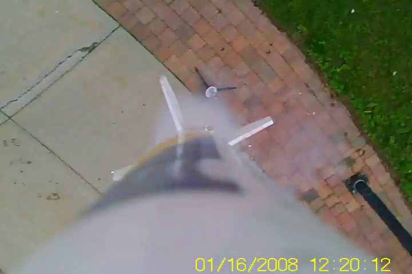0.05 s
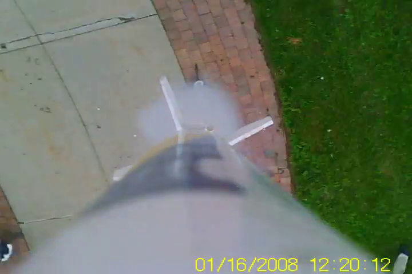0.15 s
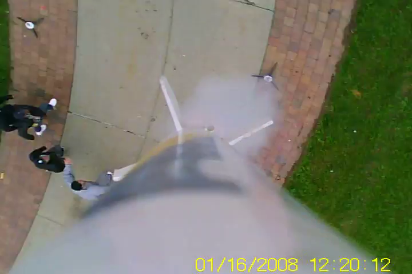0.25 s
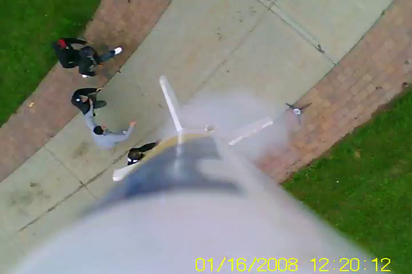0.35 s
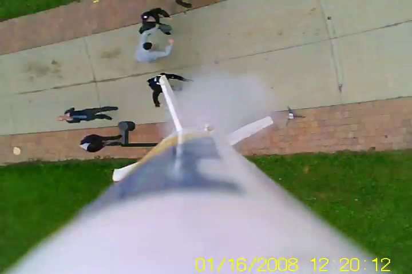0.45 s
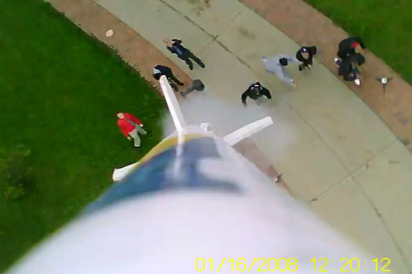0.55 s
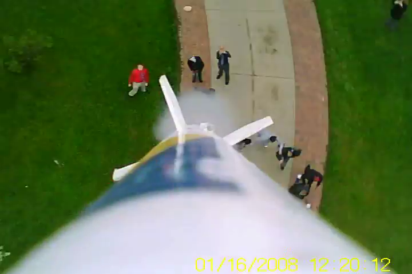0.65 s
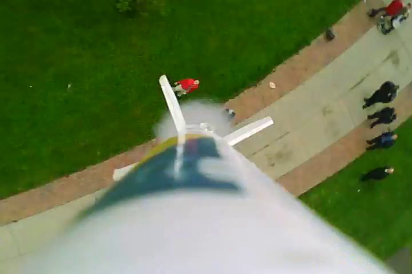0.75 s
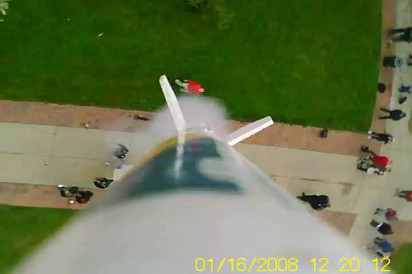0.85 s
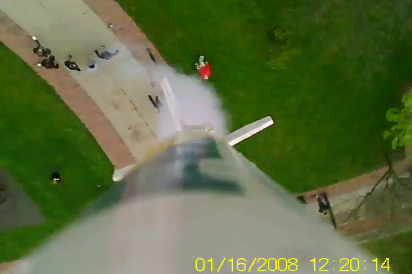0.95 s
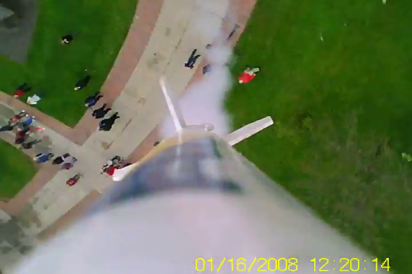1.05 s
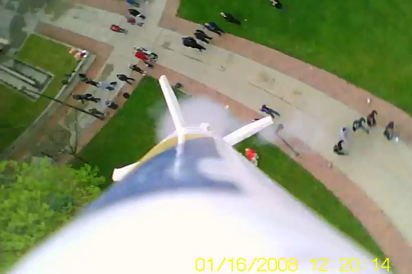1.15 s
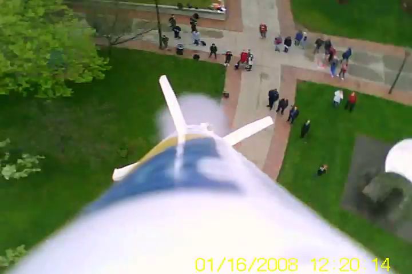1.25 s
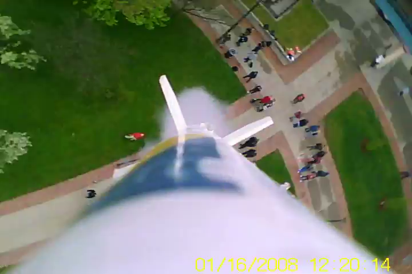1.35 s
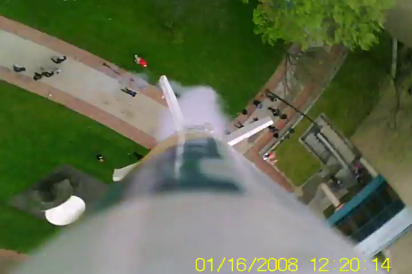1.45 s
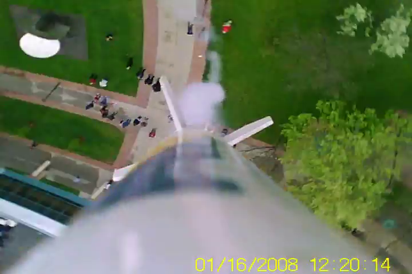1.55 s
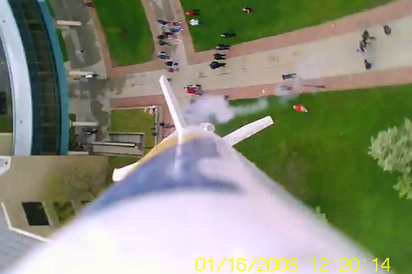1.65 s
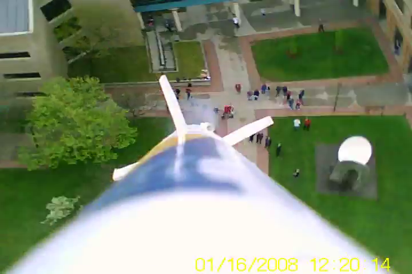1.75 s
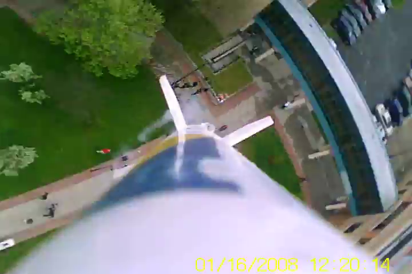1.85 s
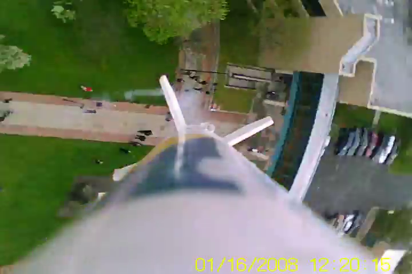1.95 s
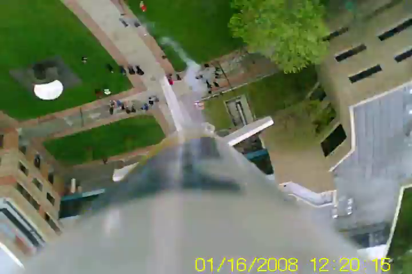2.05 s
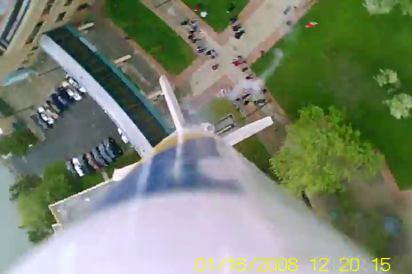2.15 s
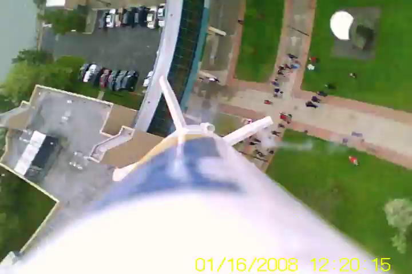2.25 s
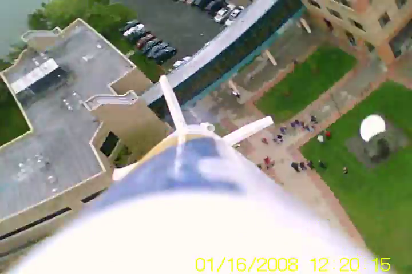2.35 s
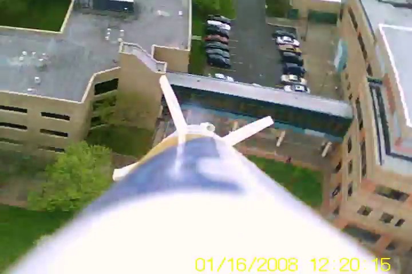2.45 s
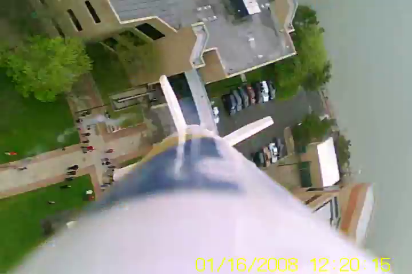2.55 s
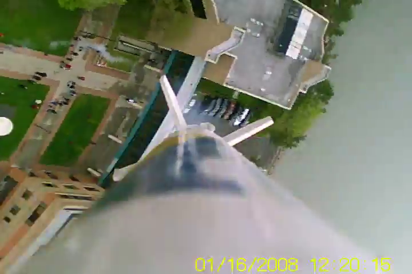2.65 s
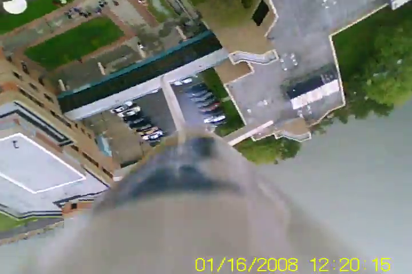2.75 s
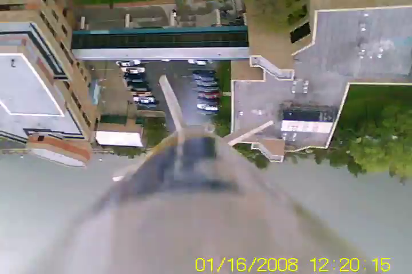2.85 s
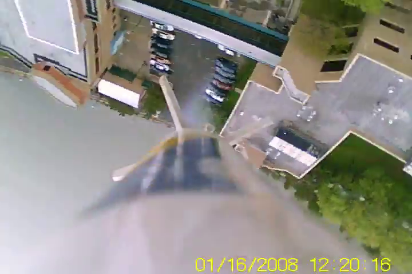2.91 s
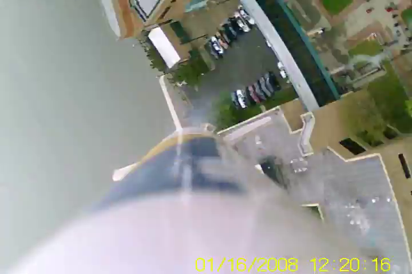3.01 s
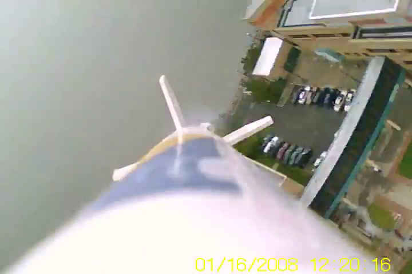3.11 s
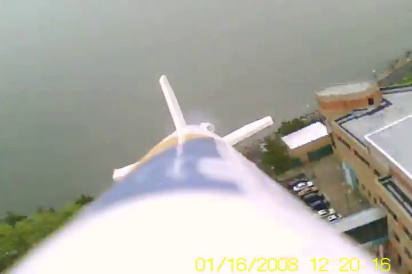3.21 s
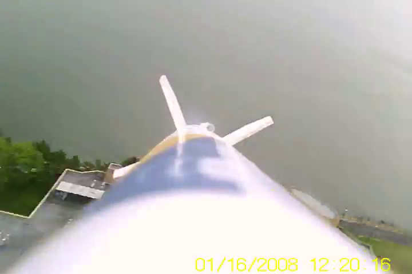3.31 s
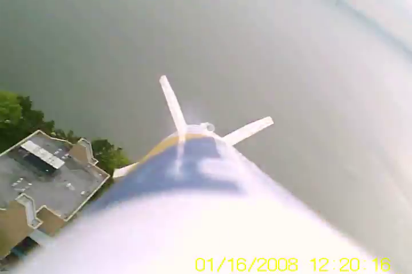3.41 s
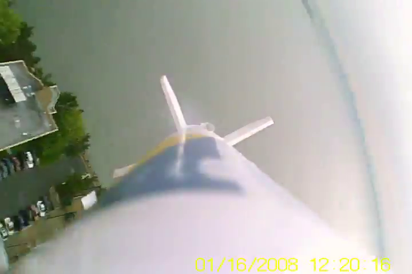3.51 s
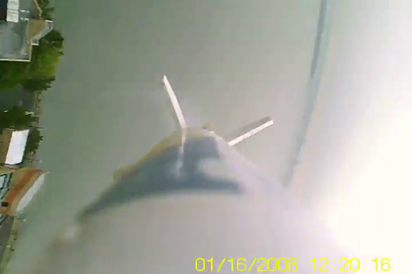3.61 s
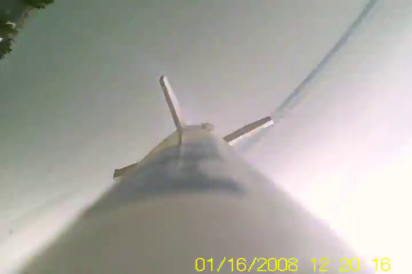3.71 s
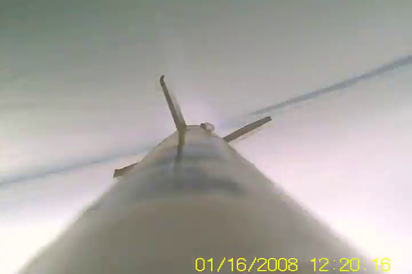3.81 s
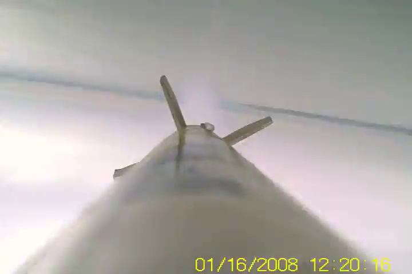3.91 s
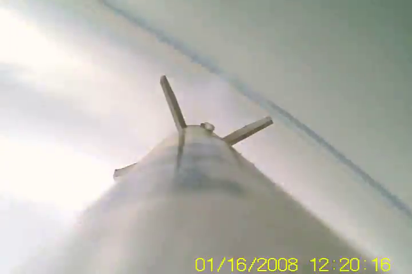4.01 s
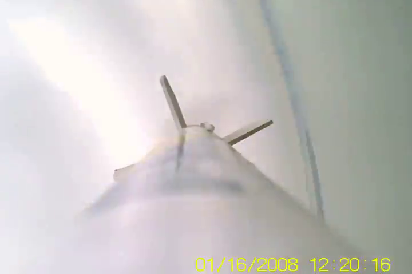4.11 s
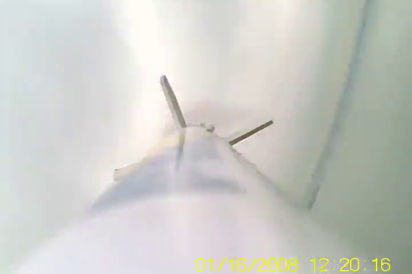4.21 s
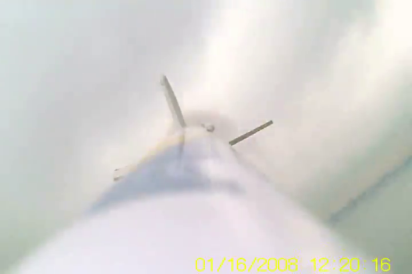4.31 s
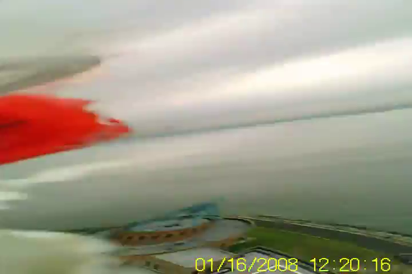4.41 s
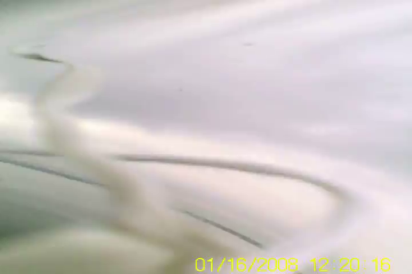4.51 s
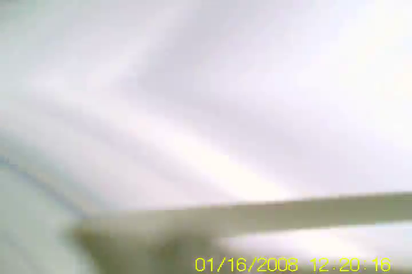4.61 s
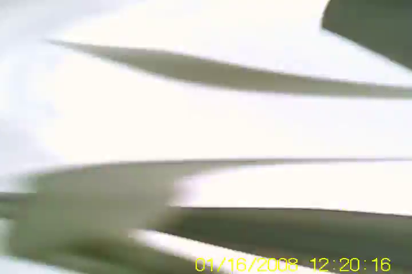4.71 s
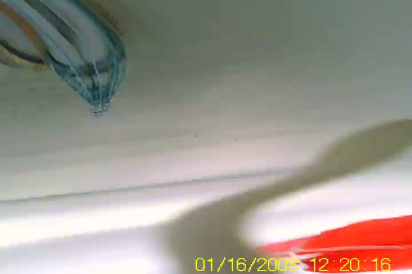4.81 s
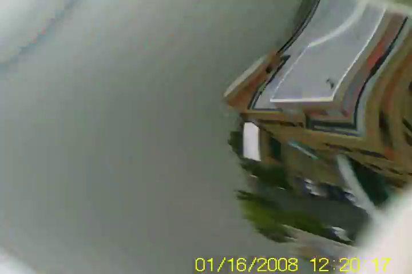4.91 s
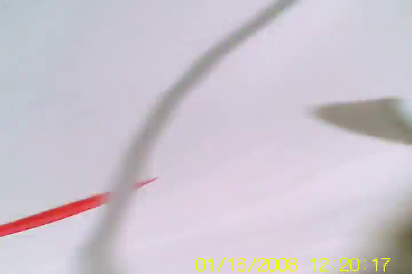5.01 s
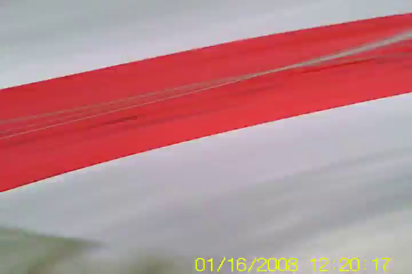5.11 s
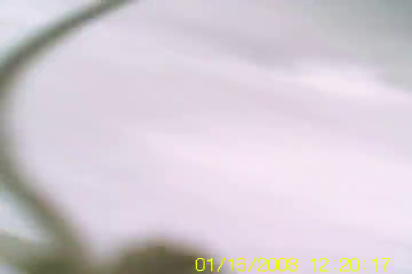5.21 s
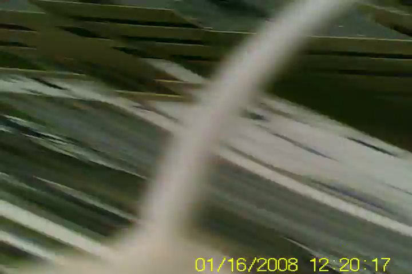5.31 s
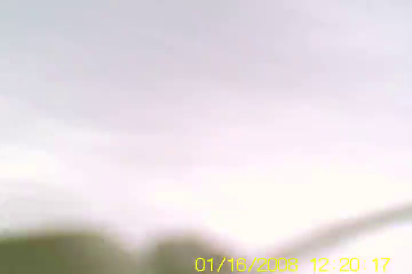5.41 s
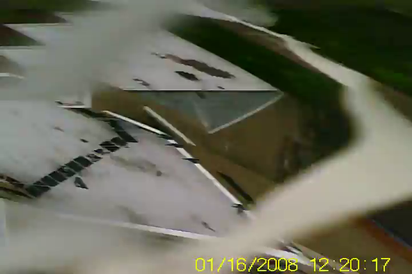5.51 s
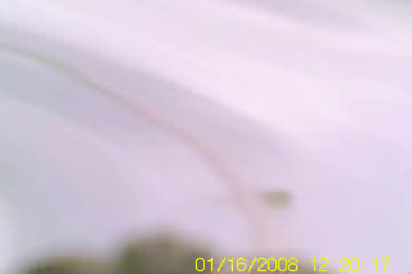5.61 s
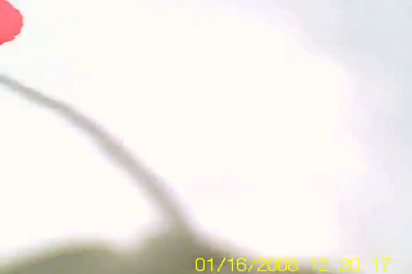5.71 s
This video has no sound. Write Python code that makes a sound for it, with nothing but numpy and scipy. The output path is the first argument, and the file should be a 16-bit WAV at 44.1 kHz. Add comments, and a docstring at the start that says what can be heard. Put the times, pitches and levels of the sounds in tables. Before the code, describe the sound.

Gusty wind and exhaust hiss rush past a climbing rocket, then a sudden loud pop leaves near silence with small clicks.

```python
"""A tiny camera rides on the side of a model rocket. First the motor's exhaust hisses; it gives way to the
airstream, whose turbulence buffets the microphone and excites the resonances of its housing, easing as the
rocket coasts. At about 4.4 s the ejection charge drives the microphone into saturation. Then the opened
airframe tumbles in near silence, its parts rubbing and ticking together over a faint electronic whine."""
import sys
import numpy as np
from scipy import signal
from scipy.fft import rfft, irfft
from scipy.io import wavfile
from scipy.ndimage import uniform_filter1d

SR = 44100
rng = np.random.default_rng(int(sys.argv[2]) if len(sys.argv) > 2 else 0)


def wav_record(signal):
    """Record a signal, one row per channel, as 16-bit PCM in the file named by sys.argv[1]."""
    frames = np.transpose(np.atleast_2d(signal))
    bounded = np.clip(frames, -1, 1)
    # unit amplitude maps onto the largest positive 16-bit level
    quanta = np.round(bounded * 32767).astype(np.int16)
    wavfile.write(sys.argv[1], SR, quanta)


N = 254016
T = np.arange(N) / SR
EJECT_S, OPEN_S = 4.398, 4.429


def undb(db):
    """Amplitude ratio of a level in decibels."""
    return 10 ** (np.asarray(db) / 20)


def unit(x):
    """Normalisation to rms 1."""
    return x / np.sqrt(np.mean(x ** 2))


def curve(table):
    """Linear interpolation of (time_s, value) rows."""
    return np.interp(T, *np.transpose(table))


def swell(peak_s, width_s):
    """Gaussian envelope: 1 at peak_s, 1/e at width_s to either side."""
    return np.exp(-((T - peak_s) / width_s) ** 2)


def walk(rate_hz):
    """Smooth random modulation of rms 1."""
    step = int(SR / rate_hz)
    held = np.repeat(rng.standard_normal(N // step + 1), step)[:N]
    return unit(uniform_filter1d(held, step))


def colour(x, spectrum):
    """Spectral shaping by (frequency_hz, level_db) rows, with a steep roll-off above the last."""
    hz, db = np.transpose(spectrum)
    bin_hz = np.maximum(np.arange(N // 2 + 1) * SR / N, 1)
    gain = undb(np.interp(np.log(bin_hz), np.log(hz), db))
    roll_off = np.minimum(1, hz[-1] / bin_hz) ** 10
    return irfft(rfft(x) * gain * roll_off, N)


def noise(spectrum):
    """Filtered Gaussian noise of rms 1."""
    return unit(colour(rng.standard_normal(N), spectrum))


def resonate(x, hz, width_hz):
    """Second-order resonance with gain 1 at its centre."""
    return signal.lfilter(*signal.iirpeak(hz, hz / width_hz, fs=SR), x)


def breathy(hz, width_hz):
    """Narrow-band noise of rms 1: a tone whose amplitude and phase wander."""
    phase = 2 * np.pi * np.cumsum(hz * np.ones(N)) / SR
    return unit(walk(width_hz) * np.cos(phase) + walk(width_hz) * np.sin(phase))


def steady(x, samples):
    """Division by the running rms holds the level and keeps the quick flutter."""
    power = uniform_filter1d(uniform_filter1d(x ** 2, samples), samples // 2)
    return x / np.sqrt(power + 1e-9)


def eddies(spectrum, per_s, strength, spread_db):
    """Shot noise: vortices cross the microphone port at random, each a dip in pressure."""
    arrivals = rng.random(N) < per_s / SR
    dips = -undb(spread_db * rng.standard_normal(N)) * arrivals
    return colour((dips - dips.mean()) * strength, spectrum)


# Spectrum of the exhaust at the camera: frequency_hz, level_db
EXHAUST_SPECTRUM = [(200, -0.5), (900, -4.5), (2000, -1), (3100, 2), (4000, -3.5), (4550, 1.5), (4950, 2),
                    (5450, -4.5), (6300, -7), (8200, -9), (9300, -13), (10400, -18), (11600, -30),
                    (12400, -50.5)]
# The exhaust fades as it is left behind and burns out: time_s, level_db
EXHAUST_ENVELOPE = [(0, -34.5), (.3, -34.5), (1.01, -36.5), (1.06, -41), (1.5, -46.5), (2.3, -51), (3, -57),
                    (4.4, -79)]


def motor(sputter_db=0.85):
    """Jet noise: the turbulent exhaust hisses and sputters slightly."""
    return undb(curve(EXHAUST_ENVELOPE)) * noise(EXHAUST_SPECTRUM) * undb(sputter_db * walk(70))


# Pressure spectra of large and of small eddies: frequency_hz, level_db
LARGE_EDDY_SPECTRUM = [(5, -7.5), (14, 6), (35, 1), (70, -3.5), (120, -6), (190, -13), (300, -29),
                       (600, -61)]
SMALL_EDDY_SPECTRUM = [(70, -23.5), (150, -3), (220, 2), (320, -2), (500, -6), (750, -10.3), (1100, -16),
                       (2000, -24), (4000, -33), (9000, -54.5)]
# Gusts striking the rolling body: peak_s, large_eddy_gain_db, small_eddy_gain_db, width_s
BODY_GUSTS = [(0.24, 4, 3, .04), (0.434, 6, 1.5, 0.037), (0.66, 5, 4.5, 0.036), (0.834, 5.5, 2.5, 0.051),
              (.94, 2, 3, .02), (1.009, 7, 6, .03), (1.17, 4, 2.5, .025), (1.279, 1, 3.5, 0.037),
              (1.479, 1.5, 5, 0.036), (1.607, 3.5, 3, .02), (1.739, 2, 5, 0.043), (1.934, 1.5, 3, 0.013),
              (2.201, 3, 2.5, 0.022), (2.335, 0, 4.5, 0.019), (2.439, -3.5, 5, .025), (2.97, 1, 3, .035),
              (4.011, 4, 5.5, 0.015), (4.37, 4, 5.5, 0.038)]


def buffeting(speed, flutter, uneven_db=1.5):
    """Turbulent pressure on the microphone port grows as a power of airspeed and swells in gusts."""
    drift_db = uneven_db * walk(22.005)
    large_db = -19.5 + drift_db + sum(db * swell(s, width) for s, db, _, width in BODY_GUSTS)
    small_db = -27 + drift_db + sum(db * swell(s, width) for s, _, db, width in BODY_GUSTS)
    large = eddies(LARGE_EDDY_SPECTRUM, per_s=900, strength=undb(2.1 * flutter), spread_db=3)
    small = eddies(SMALL_EDDY_SPECTRUM, per_s=4000, strength=undb(3.0 * flutter), spread_db=3)
    rumble = steady(large, samples=3000) * undb(large_db) * speed ** 1.59
    bursts = steady(small, samples=2400) * undb(small_db) * speed ** 2.29
    return rumble + bursts


# Spectrum of the air rushing past the housing: frequency_hz, level_db
FLOW_SPECTRUM = [(500, -0.5), (1500, 2), (2300, -2.5), (3400, -2.5), (3800, -4), (4900, -4), (5400, -10),
                 (6000, -10.5), (6500, -18), (7600, -15.5), (8800, -5.5), (9600, -13), (10600, -18.5),
                 (12200, -37.5)]
# Cavity resonances of the housing: pitch_hz, bandwidth_hz, gain_db
HOUSING_MODES = [(3320, 270, -15.5), (4000, 210, -12), (4690, 300, -13.5), (5900, 250, -1.5)]


def rush(speed, flutter, whistle_hz=4090, top_shedding_hz=1707):
    """Flow excites cavity resonances, whistles over an opening and sheds vortices from the edges."""
    flow = noise(FLOW_SPECTRUM) * undb(0.79 * flutter)
    ringing = sum(undb(db) * resonate(flow, hz, width) for hz, width, db in HOUSING_MODES)
    whistle = undb(-52.5) * speed ** 1.8 * breathy(whistle_hz, width_hz=190)
    shedding_hz = top_shedding_hz * speed  # Strouhal's law: pitch is proportional to airspeed
    aeolian_tone = undb(-12) * breathy(shedding_hz, width_hz=280)
    octave = undb(-16) * breathy(2 * shedding_hz, width_hz=280)
    return undb(-36) * speed ** 2.415 * (unit(flow + ringing) + aeolian_tone + octave) + whistle


# Strong vortices crossing the port: peak_s, strength_db
VORTEX_CORES = [(0.636, -8.5), (0.657, -13), (0.687, -19), (1.014, -14), (1.029, -11), (1.237, -12.5),
                (1.46, -6.5), (1.602, -11), (1.723, -10.5), (1.769, -10), (1.934, -21), (2.81, -22),
                (3.587, -31), (3.975, -26.5), (4.009, -23)]


def thumps(width_s=.0006):
    """Pressure is low in a vortex core, so each one passes as a sudden dip."""
    dips = sum(-undb(db) / (1 + ((T - s) / width_s) ** 2) for s, db in VORTEX_CORES)
    return colour(dips, [(30, -13), (200, -2), (3000, 6), (9000, -6)])


# Jets of gas from the charge: peak_s, level_db, rise_s, decay_s
GAS_JETS = [(4.387, -19, .0015, 0.0035), (4.3909, 1, .0004, 0.00086), (4.3946, -2.5, 0.00093, 0.0028),
            (4.3987, -1, 0.00038, 0.00014), (4.4015, -37.5, .002, .006), (4.4069, 5, .00012, .00015),
            (4.414, -38, .003, 0.0092), (4.4254, -33, .0015, 0.0018)]
# Spectrum of the escaping gas: frequency_hz, level_db
GAS_SPECTRUM = [(150, 4.5), (500, 7.5), (1000, 3), (1500, 4.5), (2100, -1), (2800, -0.5), (5000, 4),
                (7000, 0), (10000, .5), (11200, -8.5), (12500, -27.5)]
# Pressure swings as the tube vents and separates: start_s, length_s, polarity, level_db, rise_s, decay_s
PRESSURE_SWINGS = [(4.3855, .0066, -1, 4, .01, .1), (4.3942, .0012, 1, -3, .0004, .02),
                   (4.3990, .009, -1, -2, .00005, .3), (4.4065, .0005, 1, 8, .00005, .02),
                   (4.4080, .021, 1, 0, .00003, .026)]


def ejection(thump_hz=480):
    """Sudden expansion: gas jets and pressure swings, with a brief low-mid thump of overload."""
    jet_envelope = sum(undb(db) * np.exp(-np.maximum((s - T) / rise, (T - s) / decay))
                       for s, db, rise, decay in GAS_JETS)
    overload_thump = undb(-15) * breathy(thump_hz, width_hz=270) * swell(EJECT_S, width_s=0.0022)
    pressure = np.zeros(N)
    for start_s, length_s, polarity, db, rise_s, decay_s in PRESSURE_SWINGS:
        age = np.maximum(T - start_s, 0)
        attack = 1 - np.exp(-age / rise_s)
        release = np.clip(1 - age / decay_s, 0, 1) ** 2
        pressure += polarity * undb(db) * attack * release * (age < length_s)
    jets = jet_envelope * noise(GAS_SPECTRUM) * (T < OPEN_S)
    return jets + overload_thump + pressure


# Puffs of air as the open airframe swings round: peak_s, sway_db, wake_offset_db, width_s
AIR_PUFFS = [(4.45, -36.5, 4, 0.022), (4.498, -42, 3, 0.014), (4.583, -40, -5, 0.015),
             (4.64, -44.5, 6, 0.014), (4.701, -37, -8, 0.043), (4.775, -43, 4, 0.033),
             (4.834, -43, 4, .017), (5.041, -47.5, 0, 0.044), (5.246, -55, 0, .02), (5.35, -59.5, 1, 0.029)]


def tumbling(flutter, rest_db=-66.5, wake_to_sway_db=-21):
    """Vortex shedding in slow air: large eddies sway the pressure, small ones form a faint wake."""
    sway_spectrum = [(5, 5.0), (18, -1), (40, -10), (80, -21.5), (160, -30.5), (400, -61)]
    sway = steady(noise(sway_spectrum), samples=4000)
    small = eddies(SMALL_EDDY_SPECTRUM, per_s=4000, strength=undb(3.4 * flutter), spread_db=2)
    wake = undb(wake_to_sway_db) * steady(small, samples=2400)
    sway_puffs = sum(undb(db) * swell(s, width) for s, db, _, width in AIR_PUFFS)
    wake_puffs = sum(undb(db + offset) * swell(s, width) for s, db, offset, width in AIR_PUFFS)
    return (undb(rest_db) + sway_puffs) * sway + (undb(rest_db) + wake_puffs) * wake


# Cord and loose parts sliding on the tube: peak_s, level_db, width_s
SCRAPES = [(4.438, -55, .007), (4.451, -56, .008), (4.644, -62, 0.0032), (4.707, -60, 0.0037),
           (4.717, -61, .005), (4.758, -51, .005), (4.785, -68, 0.022), (4.814, -59, 0.0068),
           (5.05, -70, 0.011), (5.134, -72.5, .01)]


def rubbing(grain_db=4):
    """Sliding friction makes short, grainy bursts of noise along the tube."""
    envelope = sum(undb(db) * swell(s, width) for s, db, width in SCRAPES)
    friction = noise([(200, 4), (700, 1.5), (2000, -1.5), (4600, -3.0),
                      (6000, -14.5), (9500, -16), (12000, -34.5)])
    return envelope * unit(friction * undb(grain_db * walk(600)))


# Loose parts striking the airframe: start_s, level_db, relative_thud_db
IMPACTS = [(4.4742, -52, -16), (4.576, -49, -21), (4.6263, -39.5, -29), (4.6538, -56, -16),
           (4.6806, -44, -25), (4.739, -26.5, -10.5), (4.7574, -52, -13), (4.764, -48, -9),
           (4.8204, -31, -18.5), (4.832, -41, -22), (4.9274, -58.5, -27), (4.9488, -49, -26),
           (4.9757, -53, -22), (5.005, -50, -19), (5.0663, -51.5, -26.5), (5.0993, -43, -27),
           (5.1222, -56.5, -14), (5.3947, -54.5, -27.5)]
# Vibration modes of the airframe: pitch_hz, gain_db, t60_s
AIRFRAME_MODES = [(2675, -11, 0.0097), (3260, 7.5, 0.014), (4060, 6.5, 0.012), (4610, 7.5, 0.01),
                  (5000, 3, 0.0083), (6040, -7, 0.0084), (6980, -13, 0.0056), (8400, 1, .007),
                  (9050, -5, .007)]
# Spectrum of the tube's dull thud: frequency_hz, level_db
THUD_SPECTRUM = [(100, 3), (400, -4), (800, 6), (1600, 5), (2500, -8), (6000, -29)]


def ticks(contact_s=0.0013, scrape_db=-3, thud_s=0.005, uneven_db=4, detune=0.043):
    """Impact excitation: each contact scrapes, thuds and rings the modes, differently at every spot."""
    out = np.zeros(N)
    age = T[:SR // 10]
    tube = noise(THUD_SPECTRUM)
    crack = noise([(1000, 1.0), (3000, 0), (6000, -2.5), (10000, -4.5), (12000, -22)])
    contact = age / contact_s * np.exp(1 - age / contact_s)
    spots = rng.standard_normal((len(IMPACTS), len(AIRFRAME_MODES), 2))
    for (start_s, db, thud_db), spot in zip(IMPACTS, spots):
        start = int(start_s * SR)
        span = slice(start, start + len(age))
        force = crack[span] * contact
        ring = np.zeros(len(age))
        for (hz, mode_db, t60_s), (louder, higher) in zip(AIRFRAME_MODES, spot):
            width_hz = np.log(1000) / np.pi / t60_s
            mode = resonate(force, hz * (1 + detune * higher), width_hz)
            ring += undb(mode_db + uneven_db * louder) * mode
        tick = ring / np.abs(ring).max() + undb(scrape_db) * force / np.abs(force).max()
        thud = undb(thud_db) * tube[span] * np.exp(-age / thud_s)
        out[span] += undb(db) * (tick / np.abs(tick).max() + thud)
    return out


# Spectrum of the circuits' hiss: frequency_hz, level_db
HISS_SPECTRUM = [(20, 22.5), (70, 20), (120, 8.5), (300, 5.5), (600, 1.5), (3000, 0.5), (3800, 4),
                 (4500, 2), (10000, -0.5), (11300, -10.5), (12200, -34.5)]
# Tones of the circuits' whine: pitch_hz, level_db
WHINE_TONES = [(1200, -89.5), (3892, -82.5), (5599, -90.5), (7402, -95), (9598, -99), (10637, -99)]


def electronics(jitter_rad=.2):
    """Self-noise: the camera's circuits hiss and whine throughout, masked until the wind dies away."""
    whine = sum(undb(db) * np.sqrt(2) * np.sin(2 * np.pi * hz * T + jitter_rad * walk(30))
                for hz, db in WHINE_TONES)
    return undb(-73) * noise(HISS_SPECTRUM) + whine


# The rocket gathers speed under thrust, then coasts: time_s, fraction_of_top_speed
FLIGHT_SPEED = [(0, 0.43), (.3, 0.72), (.65, 0.9), (1.45, 1), (1.8, .86), (2.1, 0.74), (2.5, .62),
                (2.9, 0.5), (3.5, 0.45), (4.37, 0.42)]


def scene():
    """Superposition of the sources; one turbulent flutter modulates the buffeting, rush and wake."""
    speed = curve(FLIGHT_SPEED)
    turbulence = 0.57 * walk(35) + walk(140) + .95 * walk(500)
    flutter = unit(np.tanh(0.3 * turbulence))
    flight = motor() + buffeting(speed, flutter) + rush(speed, flutter) + thumps()
    closed = np.clip((OPEN_S - T) / 0.015, 0, 1)  # 1 in nose-first flight, 0 once the rocket is open
    wind = closed * flight + (1 - closed) * tumbling(flutter)
    return (wind + ejection() + ticks() + rubbing() + electronics())[None]


def record(dry, ceiling=.66, knee=8, cutoff_hz=16000):
    """Saturation and band limiting: the peaks are flattened and the highest treble is cut off."""
    saturated = dry / (1 + np.abs(dry / ceiling) ** knee) ** (1 / knee)
    dulled = colour(saturated, [(11500, 0), (12600, -10), (20000, -12)])
    low_pass = signal.ellip(8, .2, 80, cutoff_hz, fs=SR, output="sos")
    return signal.sosfilt(low_pass, dulled)


dry = scene()
out = record(dry)
wav_record(out)
```